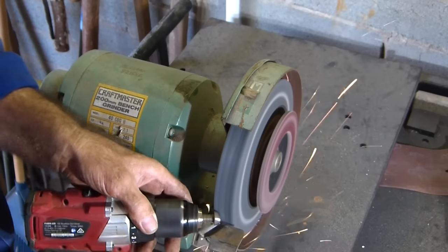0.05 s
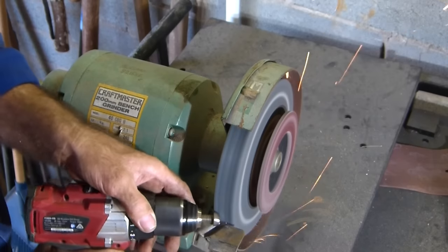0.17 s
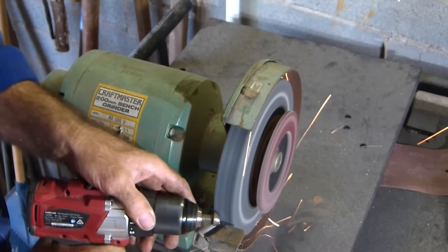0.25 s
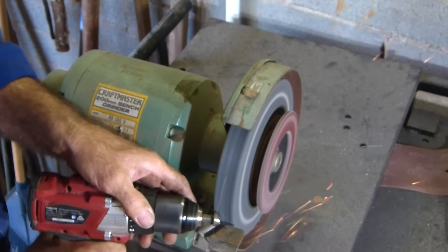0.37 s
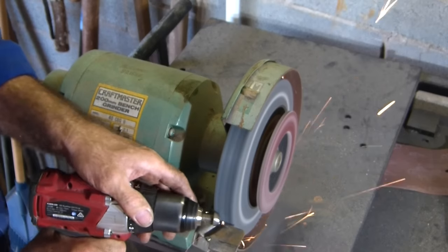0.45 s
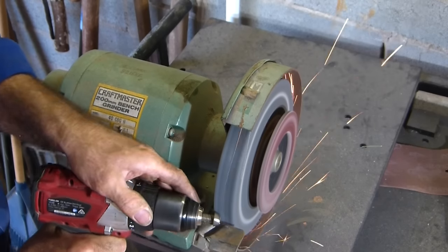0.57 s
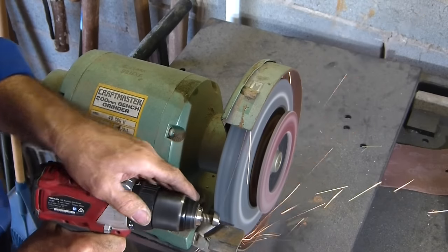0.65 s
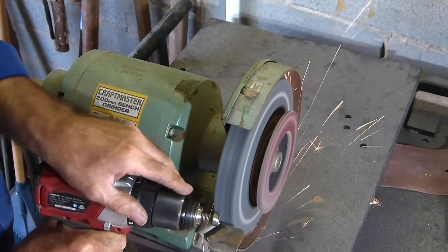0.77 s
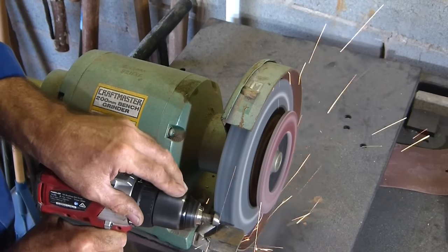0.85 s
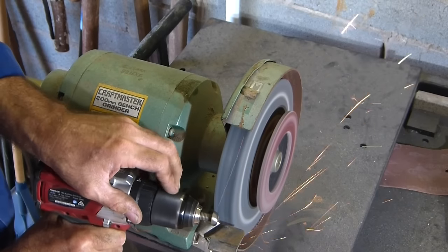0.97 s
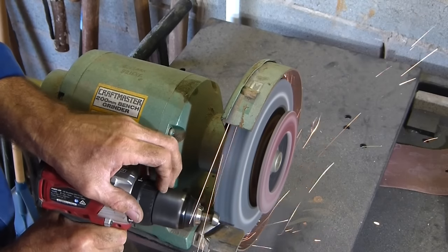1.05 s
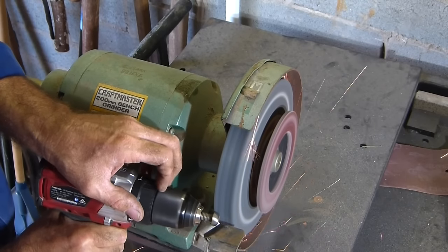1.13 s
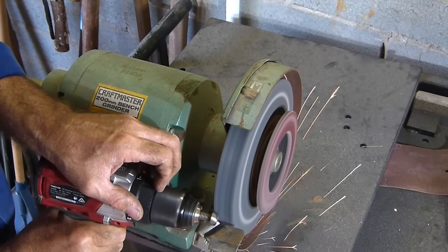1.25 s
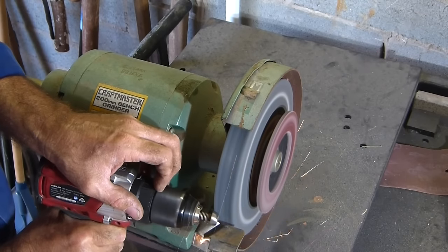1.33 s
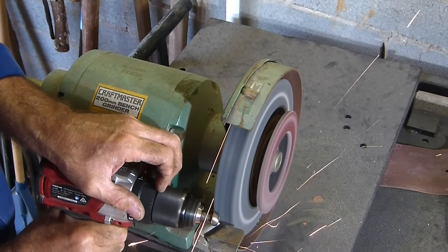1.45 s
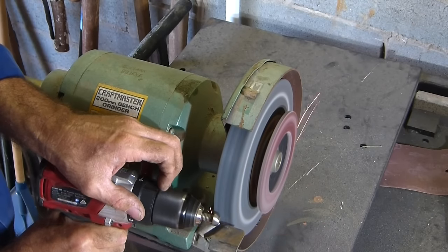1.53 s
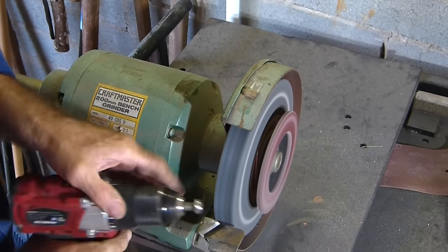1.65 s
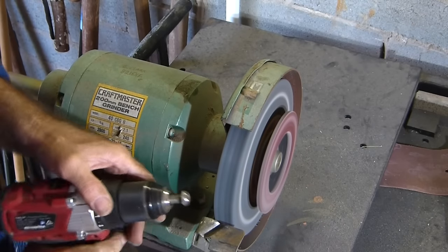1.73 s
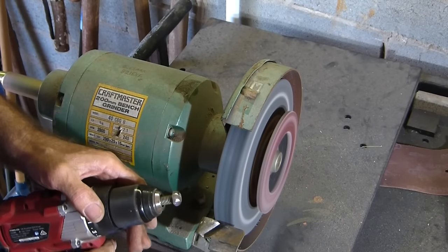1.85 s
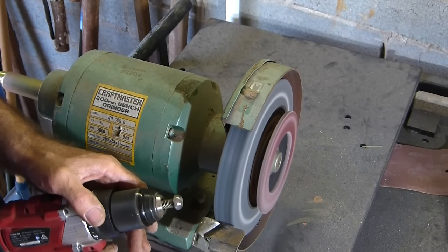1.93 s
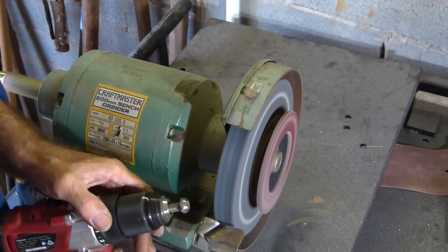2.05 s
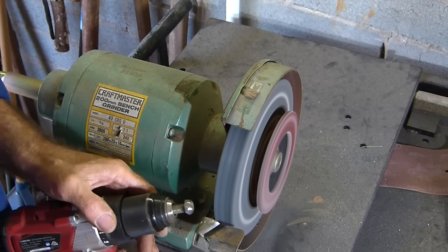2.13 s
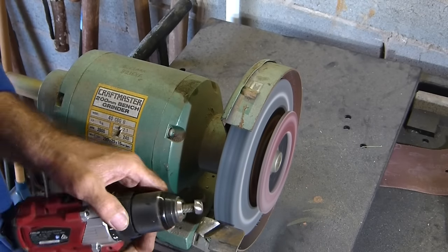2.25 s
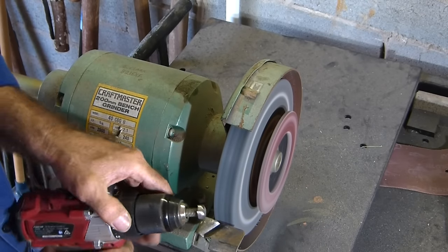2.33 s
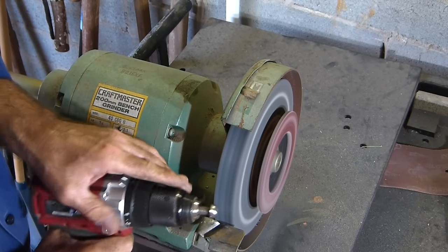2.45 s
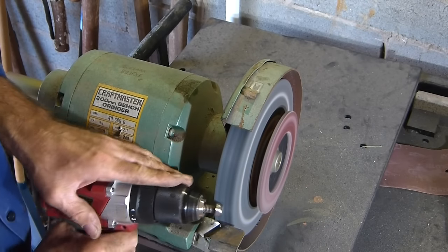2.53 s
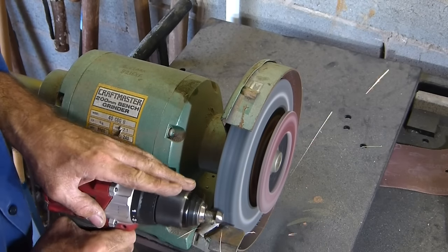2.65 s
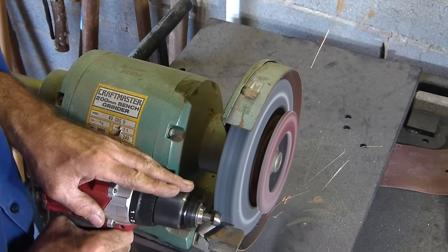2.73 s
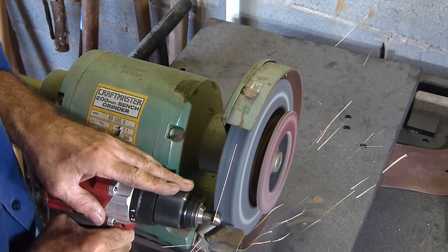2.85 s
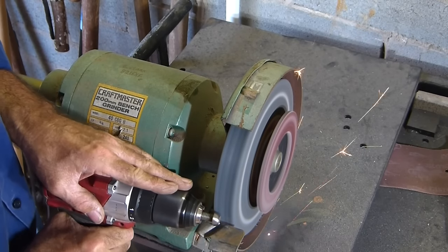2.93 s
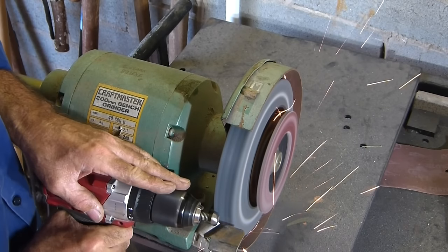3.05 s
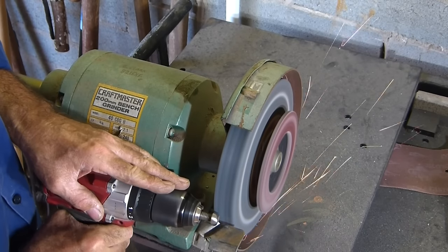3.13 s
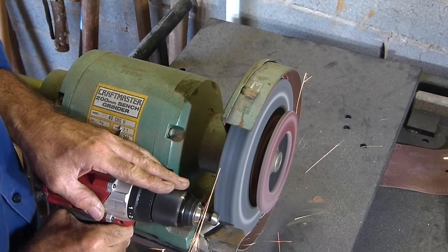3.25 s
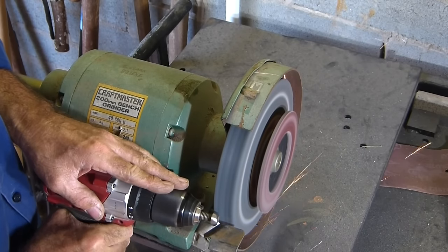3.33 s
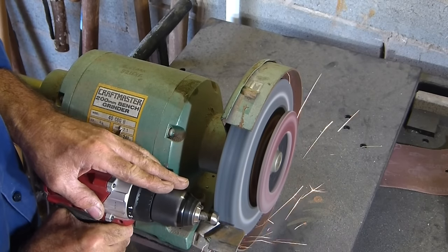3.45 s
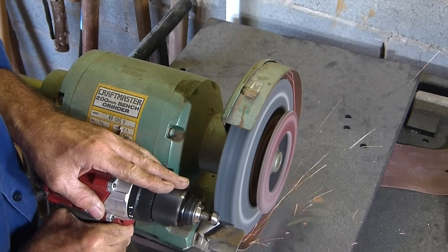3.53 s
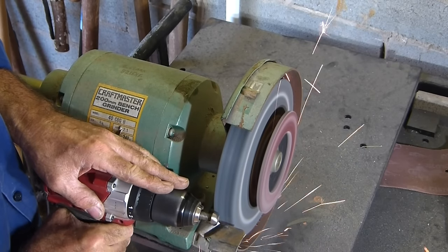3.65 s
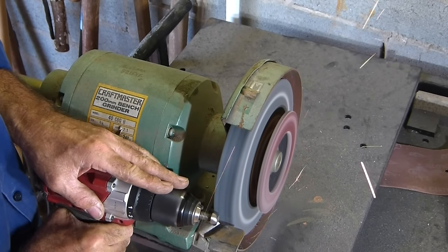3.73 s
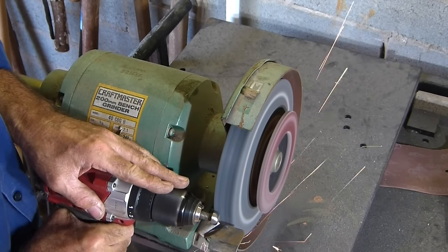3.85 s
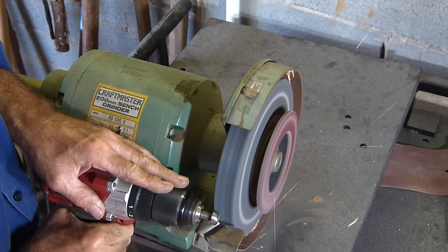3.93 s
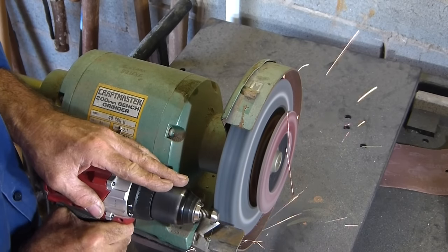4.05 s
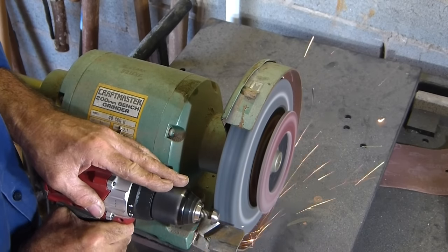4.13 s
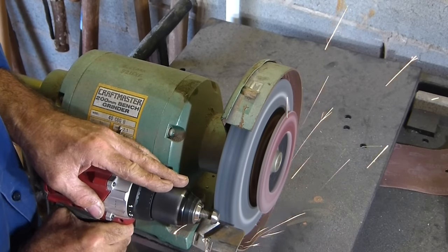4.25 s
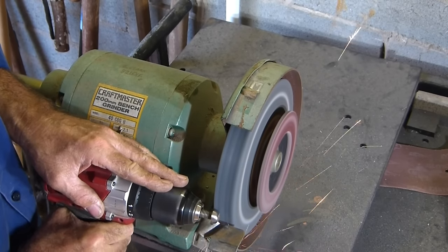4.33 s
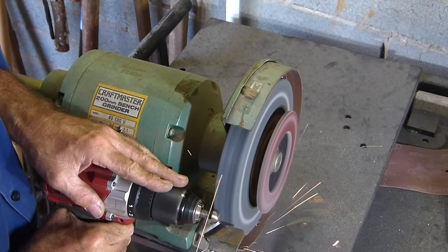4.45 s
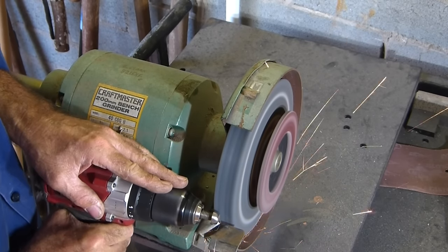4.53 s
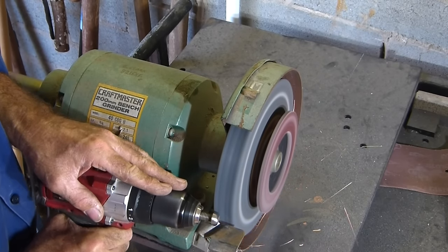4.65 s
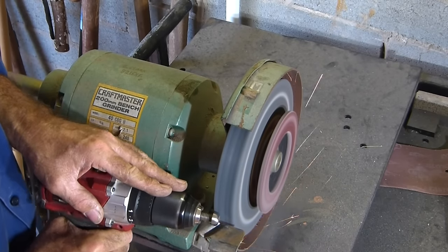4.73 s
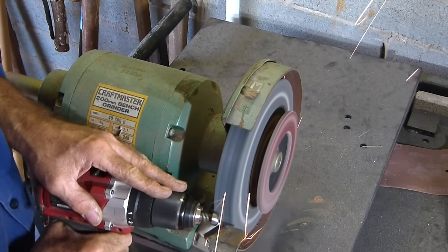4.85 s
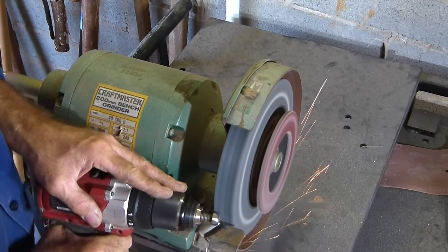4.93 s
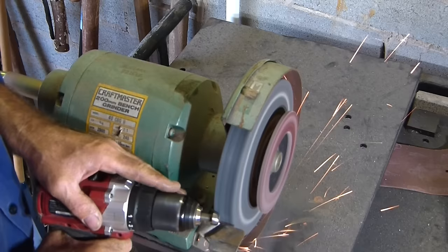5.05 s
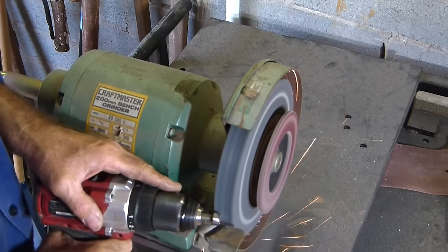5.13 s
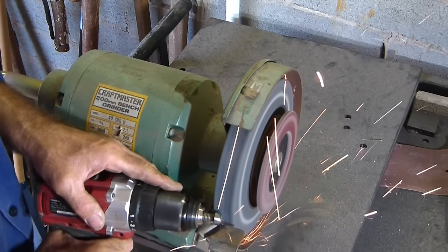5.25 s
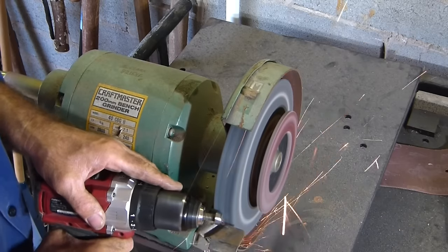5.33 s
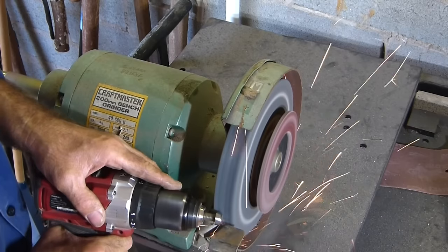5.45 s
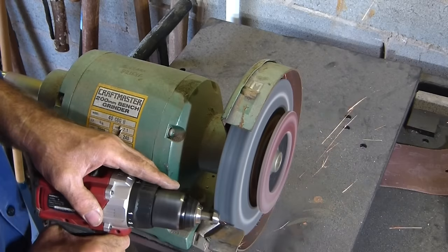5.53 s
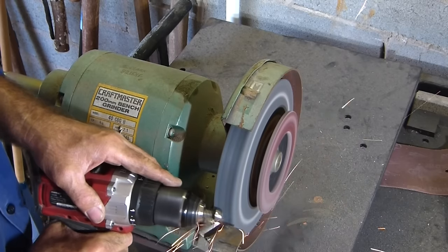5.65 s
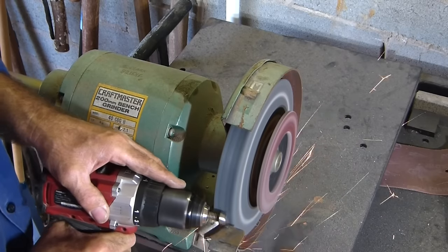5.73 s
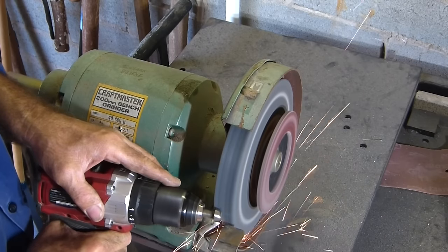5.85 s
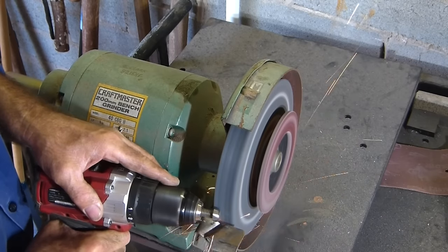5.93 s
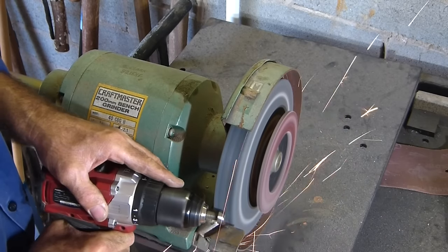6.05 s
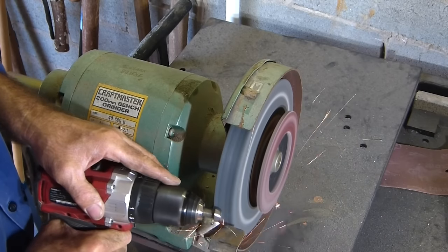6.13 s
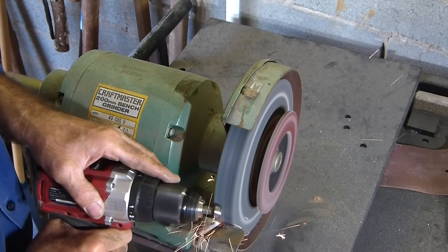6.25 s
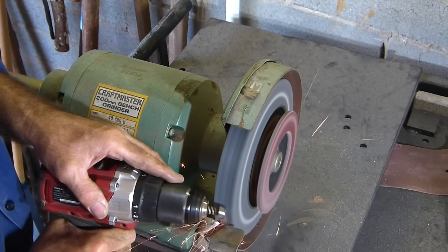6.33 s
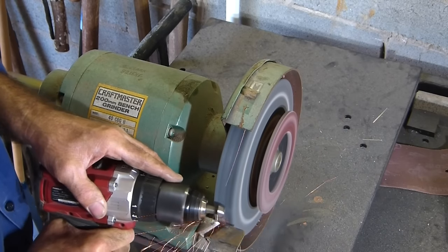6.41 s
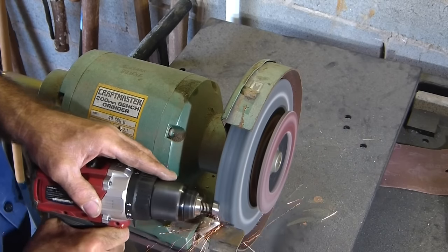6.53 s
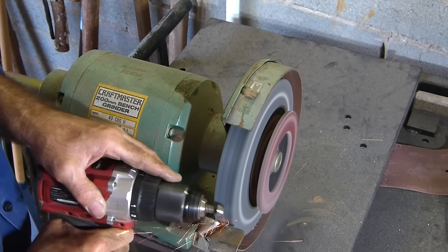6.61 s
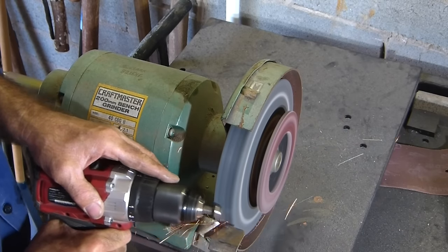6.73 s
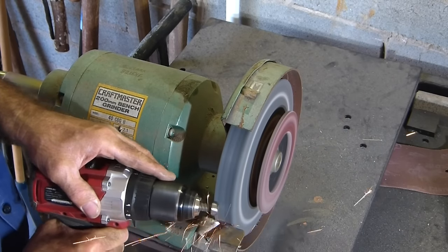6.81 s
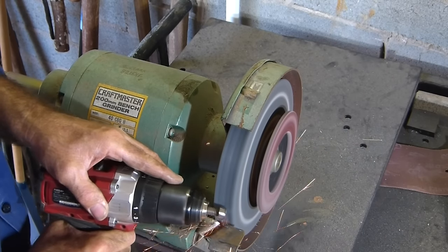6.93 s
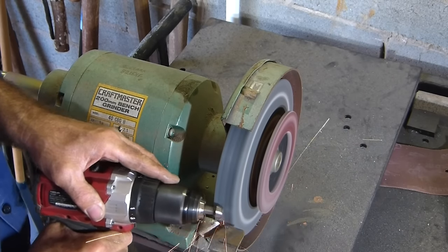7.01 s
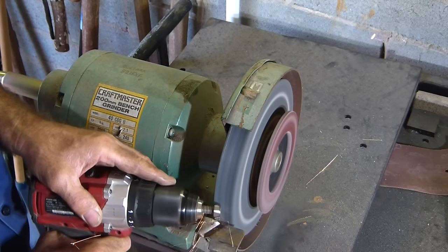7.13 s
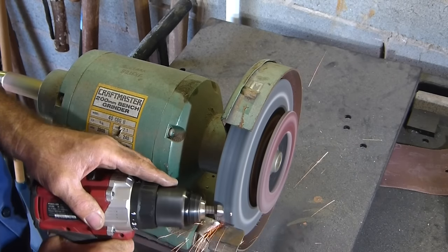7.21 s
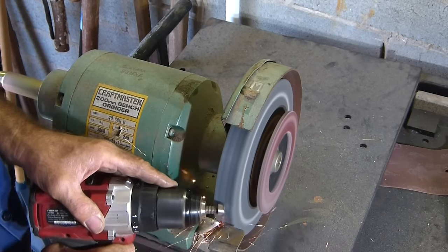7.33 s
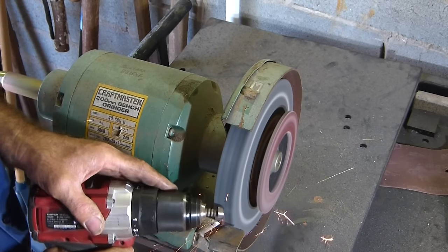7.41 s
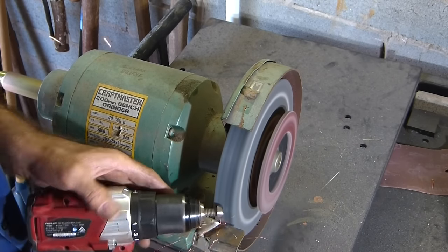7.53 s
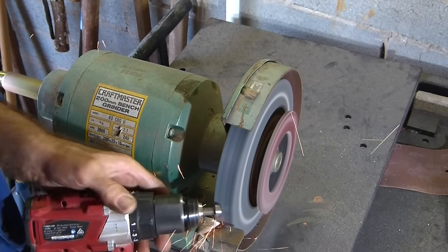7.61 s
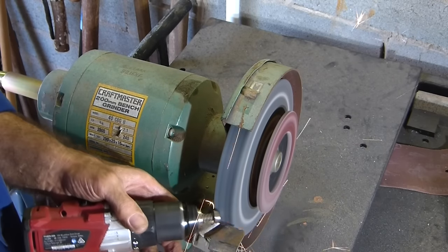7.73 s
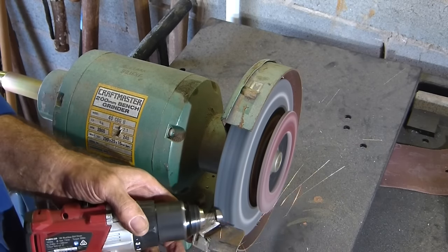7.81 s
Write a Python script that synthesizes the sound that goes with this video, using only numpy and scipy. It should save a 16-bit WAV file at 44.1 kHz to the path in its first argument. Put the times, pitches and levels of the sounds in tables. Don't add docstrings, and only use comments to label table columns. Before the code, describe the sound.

A spinning steel bolt grinds on a bench wheel with a bright buzzing hiss and drill whine, lifts off briefly, then grinds again.

```python
import sys
import numpy as np
from scipy import signal
from scipy.io import wavfile
from scipy.ndimage import uniform_filter1d

SR = 44100
rng = np.random.default_rng(int(sys.argv[2]) if len(sys.argv) > 2 else 0)


def voltage_ratio(decibels):
    exponent = np.asarray(decibels, float) / 20
    return 10 ** exponent


def inscribe(sig):
    pcm = np.round(np.clip(np.atleast_2d(sig).T, -1, 1) * 32767)
    wavfile.write(sys.argv[1], SR, pcm.astype(np.int16))


N = 347067


# f/Hz, likeness/0-1
LIKENESS = [(60, 1), (300, 1), (700, 0.94), (1500, 0.89), (2300, 1), (3100, 0.39), (5000, 0.53),
            (8000, 0.36), (15000, 0.32)]

# f/Hz, density/dB per Hz
IDLE_SPECTRUM = [(15, -51), (25, -37), (64, -29), (96, 0), (174, 0), (298, 1.5), (369, -8), (497, 11),
                 (616, -15.5), (668, -9), (851, -31), (1180, -11), (1860, -17.5), (4770, -19.5),
                 (15600, -30)]
# f/Hz, then MODE
WIND_MODES = [(1276, 170, -13, -1.1, 0, 0.87), (1450, 110, -13.5, 0, 0, 0.97),
              (4900, 260, -12.5, 0, 0, 0.87), (8960, 370, -17, 0, 0, .6)]
# f/Hz, then MODE
FRAME_MODES = [(174.2, 19, -13.5, -0.0007, -0.0064, 1), (305, 29, -38, 0, 0, 1),
               (390.2, 51, -8, 0, 0.028, 1), (489.3, 290, -6.5, -0.16, -0.017, 1),
               (597, 30, -15.5, -.4, -0.12, 0.97)]
# multiple of the turn, level over the rumble/dB
TURN_ORDERS = [(4, -17), (5, -16.5), (6, -16.5), (7, -19.5), (9, -14.5), (10, -14.5), (12, -11.5),
               (20, -26), (24, -18)]
# t/s, level/dB
HUM = [(1.82, -54), (2.15, -59), (2.6, -55), (2.92, -56.5), (3.2, -75.5), (6.07, -63), (6.64, -61),
       (7.23, -59), (7.52, -56.5), (7.87, -59)]
# t/s, level/dB
LEAN = [(1.5, -47), (2.55, -46.5), (7.15, -47.5)]
# t/s, level/dB
APPROACH = [(1.72, -64), (2.17, -60), (2.52, -57)]

# t/s, peak/dB
TAPS = [
    (1.64, -33),
    (2.5345, -24),
    (2.6575, -26),
]
# f/Hz, level/dB, t60/s
TAP_MODES = [(3730, -2, 0.015), (4840, -2, 0.03), (5350, -0.5, 0.025), (5830, -5, 0.027), (8300, -1, .01),
             (9900, -2, 0.01)]

# start/s, end/s
TRIGGER = [
    (0.0, 1.636),
    (2.655, 7.87),
]
# t/s, level/dB
VENTS = [(0.1, -66), (0.21, -53), (0.47, -46), (0.76, -57), (0.85, -76), (1.14, -66), (1.2, -56),
         (1.58, -45.5), (1.61, -53), (1.625, -43), (1.65, -56), (2.668, -41), (2.78, -43.5), (2.98, -49),
         (3.11, -46.5), (3.36, -51.5), (3.5, -50), (4.09, -47.5), (4.8, -50), (4.96, -57), (5.12, -68),
         (5.24, -53), (5.47, -54.5), (5.95, -51.5), (6.28, -50), (6.36, -49), (6.97, -48.5), (7.33, -44),
         (7.64, -46.5), (7.87, -56)]
# t/s, f/Hz, level/dB
SPIN_UP_SQUEAK = [(2.606, 10400, -57), (2.62, 10700, -57), (2.642, 10900, -59)]
GEAR_START = [(2.605, 2300, -54), (2.615, 2250, -50), (2.628, 2350, -51)]
GEAR_CATCH = [(2.628, 1700, -49), (2.64, 1600, -53), (2.652, 1850, -50)]
# start/s, end/s, level/dB
LOOSE_GRIP = [(0.12, 0.75, -47.5), (0.8, 1.45, -44.5), (2.64, 2.67, -48.5), (2.74, 3.42, -46.5),
              (4.79, 4.98, -43.5), (5.02, 5.18, -46.5), (5.24, 5.41, -44)]
# f/Hz, density/dB per Hz
RATTLE_SPECTRUM = [(440, -7.5), (750, -5), (922, -12), (1370, 0), (1480, -4.5), (1840, -5.5), (2450, -31),
                   (2500, -19), (3250, -15), (5500, -120)]
RATTLE_HZ = [987, 1124, 1357, 1550, 1822, 2088]
RATTLE_MODES = [(20, -16, 3, 0, 0.9), (35, -12, 0, 0, .95), (55, -6.5, 0, 0, 0.99), (40, -14, 0, 0, .95),
                (80, -4, -3, 0.034, 1), (45, -12, 0, 0, .95)]

# t/s, peak/dB, f/Hz
FLECKS = [(0.176, -23, 4640), (0.4609, -20, 5160), (2.5341, -26, 4850), (2.6583, -30, 4700),
          (3.2715, -20, 4860), (3.5483, -30, 6010), (3.5892, -24, 4920), (3.6215, -22, 5210),
          (3.8242, -29, 5880), (4.1315, -22, 5180), (4.2158, -29, 5120), (4.335, -28, 4880),
          (4.4104, -25, 5210), (4.4493, -23, 4880), (4.578, -23, 5390), (4.6124, -23, 5200),
          (4.7252, -20, 4900), (4.8484, -23, 5200), (4.9028, -25, 6160), (5.0809, -25, 5130),
          (5.1542, -18, 6120), (5.194, -16, 4840), (5.2345, -17, 5340), (5.2834, -23, 5220),
          (5.5573, -24, 6020), (5.5997, -34, 5540), (5.672, -31, 6120), (5.7354, -30, 6070),
          (6.1878, -21, 5130), (6.2238, -27, 5460), (6.2677, -26, 5820), (6.4248, -32, 5220),
          (6.4911, -19, 5000), (6.561, -23, 6150), (6.759, -27.5, 6080), (6.792, -24, 5260),
          (6.8154, -18, 6090), (6.8598, -24, 5430), (7.0329, -28, 6060), (7.087, -17, 6060),
          (7.206, -20, 5260), (7.2873, -26, 5110), (7.3123, -29, 4950), (7.428, -22, 6090),
          (7.4869, -30, 5130), (7.5288, -28, 5058), (7.5677, -24, 5110), (7.6016, -21, 5100),
          (7.7209, -24, 5210), (7.7801, -30, 6060)]
# t/s, peak/dB, f/Hz
GUARD_TICKS = [(0.2377, -40, 10800), (0.4203, -30, 10800), (0.4767, -35, 10700), (0.5021, -40, 10800),
               (0.573, -40, 10600), (0.6014, -34, 10800), (0.6807, -40, 10700), (0.7057, -36, 10800),
               (0.7506, -37, 10900), (0.793, -42, 10800), (0.8708, -43, 10700), (0.9032, -38, 10700),
               (0.992, -36, 10700), (1.0274, -36, 10700), (1.0664, -37, 10800), (1.1088, -37, 10800),
               (1.1537, -36, 10800), (1.1886, -33, 10800), (1.2315, -40, 10800), (1.2699, -37, 10700),
               (1.3038, -35, 10700), (1.3462, -40, 10900), (1.3871, -37, 10700), (1.425, -35, 10700),
               (1.4694, -38, 10900), (1.4989, -39, 10800)]
# t/s, f/Hz, level/dB, t60/s
AFTER_RING = [(2.55, 3400, -51, 0.25), (2.545, 6060, -51, .06), (2.56, 7200, -49, .2),
              (2.56, 9800, -52, .1), (2.676, 7284, -46, .06)]

# f/Hz; MODE; rest/dB, slope/dB per s, ring-out/dB per s
SONG_HZ = [3526, 7005, 7284, 11391]
SONG_MODES = [(21.7, -2.5, -5.5, -0.2, 0.75), (22, 2, 6, -3.5, 0.19), (21.6, 4.5, -5, 0.6, 0.79),
              (16, 2.4, 2.5, 1.1, 0.94)]
SONG_RULES = [(-54, 27, 780), (-61.5, 20, 690), (-64, 54, 240), (-67, 25, 200)]
# t/s, level/dB
SONG_LOW = [(0.2, -40.5), (0.45, -44), (0.93, -43.5), (1.14, -43), (1.5, -44), (3.1, -40.5), (3.3, -37.5),
            (3.45, -40), (3.9, -38.5), (4.08, -38), (4.34, -37.5), (4.69, -40), (5.53, -40), (5.91, -42.5),
            (6.1, -39.5), (6.55, -41.5), (6.84, -42), (7.1, -43.5), (7.68, -38.5)]
SONG_MID = [(0.48, -47.5), (1.1, -51), (1.59, -48), (3.15, -51), (3.62, -48.5), (3.95, -49), (4.5, -53),
            (5.3, -51.5), (5.63, -53), (6.84, -57), (7.68, -51), (7.87, -46)]
SONG_TWIN = [(0.0, -41), (0.45, -47), (0.73, -52), (1.08, -49), (1.35, -51), (1.55, -48), (2.84, -45),
             (3.12, -44.5), (3.3, -44), (3.62, -44.5), (3.9, -45), (4.2, -44), (4.57, -46), (5.05, -43),
             (5.63, -46), (6.26, -44.5), (6.57, -49), (6.85, -46), (7.15, -49), (7.87, -57)]
SONG_HIGH = [(0.27, -57), (0.72, -53), (1.22, -57), (1.68, -46.5), (2.9, -46), (3.28, -38.5), (3.5, -41),
             (3.85, -40), (4.16, -41), (4.65, -42.5), (5.1, -48), (5.63, -45), (5.92, -48), (6.26, -49),
             (6.84, -52), (7.7, -49)]
# t/s, level/dB
WAKE = [(1.8, -1), (1.9, -8), (2.68, -6), (2.8, -2.5)]
# t/s, level/dB
REST = [(0.05, -43.5), (0.4, -45.5), (7.6, -47.5)]
# t/s, level/dB
CHUCK = [(0.2, -70), (0.35, -58), (0.6, -61), (1.1, -58), (1.45, -59), (1.62, -100)]

# f/Hz, density/dB per Hz
HISS_SPECTRUM = [(1180, -17.5), (2000, -11.5), (2970, -10.5), (3440, -4.5), (4120, -9.5), (7640, -4),
                 (9720, -7), (10500, -6), (12200, -6), (14600, -24.5), (15600, -53)]
# f/Hz, then MODE
CHIPPED_MODES = [(5090, 1080, -1.5, 0.73, -0.11, 0.96), (6060, 160, -8.5, -.6, .06, 0.93)]
# f/Hz; MODE; rest/dB, slope/dB per s, ring-out/dB per s
FED_HZ = [3930, 4247, 11768]
FED_MODES = [(14, -13, 2, -0.37, .95), (26, -20.5, -7, -.4, 0.9), (24, -8.5, 0, -2.3, .7)]
FED_RULES = [(-48, 4.0, 600), (-42, 6.9, 600), (-48, 70, 330)]
# t/s, level/dB
FED_SWELLS = [
    [(5.5, -41), (6.3, -42), (7.0, -38)],
    [(.4, -29), (5.8, -32), (6.7, -29), (7.3, -32)],
    [(.38, -41), (.73, -38), (.89, -41), (1.01, -41), (1.27, -39), (1.42, -40), (3.0, -42), (3.3, -39),
     (3.6, -41), (3.9, -40), (4.7, -41), (5.7, -40), (6.9, -43), (7.5, -42)],
]

# t/s, f/Hz
BOLT_PITCH = [(0.0, 9780), (1.6, 9760), (2.9, 9730), (3.6, 9630), (5.2, 9650), (6.5, 9620), (7.87, 9680)]
BOLT_RATIOS = [1, 1.245, .357]
BOLT_MODES = [(230, 3, 0.7, -0.4, 0.86), (200, -9, -6.5, 0.79, 0.58), (430, -9, 1.5, 0.047, 0.79)]
# t/s, f/Hz
SHANK_PITCH = [(0, 3335), (1.6, 3340), (2.9, 3345), (3.5, 3358), (7.87, 3366)]
# t/s, level/dB
SHANK = [(0.06, -44), (0.3, -44), (0.55, -45), (0.85, -46), (1.0, -45), (1.2, -44), (1.3, -46), (1.45, -44),
         (3.02, -45), (3.2, -40.5), (3.42, -39), (3.7, -41.5), (4.08, -40), (4.35, -42), (4.62, -40.5),
         (5.2, -42), (5.62, -42.5), (6.2, -44.5), (6.83, -43.5), (7.13, -43), (7.48, -39.5), (7.68, -38.5)]
# t/s, peak/dB
BITES = [(0.094, -19.5), (0.182, -26), (0.5766, -17.5), (0.7148, -28), (0.768, -18), (0.8515, -33),
         (0.9901, -21), (1.039, -18), (1.08, -21), (1.2047, -20), (1.283, -22), (1.478, -22), (1.5484, -30),
         (1.5565, -35), (1.566, -32), (1.5715, -20), (1.5908, -29), (1.6, -33), (2.6572, -22), (2.68, -22),
         (2.6843, -21), (2.701, -20), (2.7242, -20), (2.7405, -22), (2.83, -18), (2.8629, -17),
         (2.928, -16.5), (3.022, -20), (3.1487, -31), (3.2994, -24), (3.4521, -24), (3.5344, -23),
         (3.6691, -18.5), (4.114, -26), (4.1634, -28), (4.2462, -24), (4.3874, -18), (4.948, -17),
         (5.1317, -29), (5.3802, -19), (5.466, -27), (5.6146, -24), (5.8112, -18), (6.0117, -21),
         (6.2327, -26), (6.366, -16.5), (6.62, -19.5), (6.7575, -21), (6.8503, -21), (6.9252, -23),
         (7.0344, -21), (7.194, -26), (7.227, -23), (7.2898, -28), (7.4285, -20), (7.582, -17.5),
         (7.621, -15), (7.6894, -17), (7.7757, -28)]

# start/s, end/s, hiss/dB, ring/dB
TOUCHES = [(0.0, 1.558, -44.5, -39), (1.564, 1.612, -47.5, -47), (1.6, 1.652, -55, -64),
           (1.627, 1.634, -52, -51), (1.638, 1.653, -52.5, -58), (2.534, 2.538, -45, -54),
           (2.549, 2.559, -54, -41), (2.562, 2.6, -60, -60), (2.604, 2.645, -55, -62),
           (2.649, 2.655, -54, -35), (2.657, 2.66, -41, -32.5), (2.662, 2.677, -49, -62),
           (2.679, 7.87, -42.5, -38.5)]
# t/s, level/dB
PUSH = [(0.0, -0.5), (0.3, 1), (0.7, 0), (1.2, -2), (1.55, 0.5), (2.7, -1), (2.85, 1.5), (3.3, -2.5),
        (4.0, -1), (4.7, -1), (5.2, -1), (5.7, -0.5), (6.3, 0), (6.8, 0), (7.4, -1.5), (7.87, -2)]

CORNERS_HZ, WHEEL_HZ, TURN_HZ = 126, 50.5, 49.75


def rms_one(x):
    return x / np.sqrt(np.mean(np.abs(x) ** 2) + 1e-20)


def in_time(rows):
    s, *columns = np.transpose(rows)
    return [np.interp(np.arange(N) / SR, s, c) for c in columns]


def at_hz(points, hz):
    point_hz, value = np.transpose(points)
    return np.interp(np.log(hz), np.log(point_hz), value)


def held(start_s, end_s, fade_s):
    t = np.arange(N) / SR
    return np.clip(1 + np.minimum(t - start_s, end_s - t) / fade_s, 0, 1)


def bouts(rows, rise, fall):
    t = np.arange(N) / SR
    off = [rise * np.clip(start - t, 0, None) + fall * np.clip(t - end, 0, None) for start, end, *_ in rows]
    levels = np.transpose(rows)[2:]
    return [np.max([db - o for db, o in zip(column, off)], axis=0) for column in levels]


def swells(peaks, rest_db, slope_db_per_s, ring_out_db_per_s, contact_db=0):
    t = np.arange(N) / SR
    level, = bouts([(s, s, db) for s, db in peaks], slope_db_per_s, slope_db_per_s)
    fall = ring_out_db_per_s * t
    return np.maximum(level, rest_db) + np.maximum.accumulate(contact_db + fall) - fall


def drift(rate_hz):
    r = np.exp(-40 * np.pi * rate_hz / SR)
    slow = signal.lfilter([1], [1, -2 * r, r * r], rng.standard_normal(N // 20 + 4002))[4000:]
    return np.interp(np.arange(N) / 20, np.arange(len(slow)), rms_one(slow))


def throb(rate_hz, wander, sharp, uneven_db):
    turns = np.cumsum(rate_hz * (1 + wander * drift(13.25))) / SR
    strength = rng.standard_normal(2000)[turns.astype(int)]
    return rms_one(voltage_ratio(uneven_db * strength) * np.exp(sharp * -np.cos(2 * np.pi * turns)))


def chips(per_s, size, decay_s):
    born = (rng.random(N) < per_s / SR) * np.minimum(rng.exponential(1, N), 2.5) * size
    return rms_one(1 + signal.lfilter([1], [1, -np.exp(-1 / (decay_s * SR))], born))


def mode(hz, width_hz, level_db, pan_db, lead_rad, alike, drive=1, steady=0):
    r, skirt = np.exp(-np.pi * width_hz * np.array([1, 3.0]) / SR)
    push = rng.standard_normal((2, N // 4 + 1)) + 1j * rng.standard_normal((2, N // 4 + 1))
    swing = signal.lfilter([1], np.poly([r, skirt]), np.repeat(push, 4, axis=1)[:, :N] * drive)
    alike = np.clip(alike, 0, 1)
    right = (alike * swing[0] + np.sqrt(1 - alike ** 2) * swing[1]) * np.exp(1j * lead_rad)
    pair = np.array([swing[0], right]) * voltage_ratio(np.array([[.5], [-.5]]) * pan_db)
    pair = pair / (np.abs(rms_one(pair.mean(axis=0))) + .15) ** np.clip(steady, 0, 1)
    carrier = np.exp(2j * np.pi * np.cumsum(hz * np.ones(N)) / SR)
    out = (pair * carrier).real
    return voltage_ratio(level_db) * out / out.mean(axis=0).std()


def banded_noise(spectrum, patchy_db, flicker_hz):
    bottom, top = spectrum[0][0], spectrum[-1][0]
    edges = bottom * 2 ** np.arange(0, np.log2(top / bottom) + .3, 1 / 3)
    white = rng.standard_normal((2, 2, N))
    out = 0
    for k, (low, high) in enumerate(zip(edges, edges[1:])):
        band = signal.butter(2, [low, min(high, 19000)], "band", fs=SR, output="sos")
        mid, side = signal.sosfilt(band, white[k % 2])
        hz = np.sqrt(low * high)
        alike = np.clip(at_hz(LIKENESS, hz), 0, .996)
        gain = voltage_ratio(at_hz(spectrum, hz) + patchy_db * drift(flicker_hz))
        out = out + gain * (np.sqrt(1 + alike) * mid + np.sqrt(1 - alike) * side * [[1], [-1]])
    return out / out.mean(axis=0).std()


def grinder(contact_db):
    idle_db, load_db, waver_db, settle_s = -53.5, -49.5, -1.5, 0.053
    load = uniform_filter1d(voltage_ratio(contact_db), round(settle_s * SR), mode="nearest")
    rumble_db = idle_db + (load_db - idle_db) * load + waver_db * drift(8.3)
    lean_db = swells(LEAN, rest_db=-80, slope_db_per_s=31, ring_out_db_per_s=300)
    rumble_db = np.maximum(rumble_db, lean_db)
    noise = banded_noise(IDLE_SPECTRUM, patchy_db=1.7, flicker_hz=20)
    low = signal.sosfilt(signal.butter(4, 800, fs=SR, output="sos"), noise)
    top = signal.sosfilt(signal.butter(4, 800, "high", fs=SR, output="sos"), noise)
    rumble = voltage_ratio(-8.0) * rms_one(low) + sum(mode(*row) for row in FRAME_MODES)
    rumble = rumble + sum(mode(TURN_HZ * round(k), 5, db, 0, 0, .998, steady=.7) for k, db in TURN_ORDERS)
    hum_db = swells(HUM, rest_db=-71, slope_db_per_s=64, ring_out_db_per_s=300)
    hum = voltage_ratio(hum_db) * mode(2 * TURN_HZ, 5, -1.7, 0, 0, .999, steady=.8)
    wind = rms_one(top) + sum(mode(*row) for row in WIND_MODES)
    return voltage_ratio(rumble_db) * rumble + hum + voltage_ratio(in_time(APPROACH)[0] + 3.5) * wind


def taps():
    out = np.zeros((2, N))
    t = np.arange(2000) / SR
    for s, db in TAPS:
        crack = voltage_ratio(-14) * rng.standard_normal((2, 2000)) * np.exp(-t / 0.0024)
        rings = sum(voltage_ratio(lv - 4.5 - 60 * t / t60) * np.sin(2 * np.pi * hz * t) for hz, lv, t60 in TAP_MODES)
        at = round(s * SR)
        out[:, at:at + 2000] += voltage_ratio(db) * (crack + rings) * np.clip(t / 0.00053, 0, 1)
    return out


def motor():
    whine_hz, creep_hz_per_s, wobble_hz = 2613, 1.2, 5
    start_hz, climb_s, sag_hz, sag_s = 1960, 0.018, 110, 0.014
    skirt_db, rough_db, rough_s, half_db = -17.5, 1.5, 0.032, -18.5
    t = np.arange(N) / SR
    (first_on, let_go), (pulled, last_off) = TRIGGER
    second = t > 2
    since_pull = np.clip(t - pulled, 0, None)
    climb = np.exp(-since_pull / climb_s)
    sag = sag_hz * np.exp(-np.clip(let_go - t, 0, None) / sag_s)
    hz = whine_hz + creep_hz_per_s * t + wobble_hz * drift(8.7)
    hz = hz - np.where(second, (whine_hz - start_hz) * climb, sag)
    running = held(first_on, let_go, .025) + held(pulled, last_off, .003)
    whine = mode(hz, 4, 0, 0.76, -1.52, .97, steady=1)
    rough_gain = voltage_ratio(skirt_db) + second * np.exp(-since_pull / rough_s)
    rough = rough_gain * mode(hz, 210, rough_db, 0.82, -1.3, 1.0)
    half = (1 - climb * second) ** 4 * mode(hz / 2, 9.5, half_db, 0, 0, 0.79, steady=0.3)
    return running * voltage_ratio(in_time(VENTS)[0]) * (whine + rough + half)


def gears():
    out = 0
    for rows, width_hz, steady in [(SPIN_UP_SQUEAK, 60, .6), (GEAR_START, 320, 0), (GEAR_CATCH, 300, 0)]:
        hz, db = in_time(rows)
        tone = mode(hz, width_hz, 0.11, 0.76, -0.51, 1.0, steady=steady)
        out = out + held(rows[0][0], rows[-1][0], 0.011) * voltage_ratio(db) * tone
    return out


def rattle(contact_db):
    firm_db, grip_db_per_s, waver_db = -51.5, 110, 1.0
    knocks = throb(CORNERS_HZ / 6, wander=0.052, sharp=0.4, uneven_db=.8)
    body = banded_noise(RATTLE_SPECTRUM, patchy_db=2.0, flicker_hz=20)
    for hz, row in zip(RATTLE_HZ, RATTLE_MODES):
        body = body + mode(hz, *row, drive=knocks, steady=0.084)
    loose_db, = bouts(LOOSE_GRIP, grip_db_per_s, grip_db_per_s)
    shake_db = np.maximum(loose_db, firm_db) + waver_db * drift(21.0)
    return voltage_ratio(shake_db + 0.42 * contact_db - 4.5) * body


def pings():
    out, t = np.zeros((2, N + 8000)), np.arange(8000) / SR
    fleck_top_db, fleck_db, fleck_t60_s = -24, -5, 0.012
    guard_db, guard_t60_s = -0.5, 0.035
    rows = [(s, hz, min(db, fleck_top_db) + fleck_db, fleck_t60_s) for s, db, hz in FLECKS]
    rows += list(AFTER_RING)
    rows += [(s, hz, db + guard_db, guard_t60_s) for s, db, hz in GUARD_TICKS]
    for (s, hz, db, t60), (phase, pan) in zip(rows, rng.uniform(-0.8, 1, (len(rows), 2))):
        tone = np.sin(2 * np.pi * hz * t + np.pi * phase) * voltage_ratio(db - 60 * t / t60)
        tone = tone * np.clip(t / 0.00034, 0, 1)
        at = round(s * SR)
        out[:, at:at + 8000] += tone * voltage_ratio(2 * pan * np.array([[1], [-1]]))
    return out[:, :N]


def wheel(contact_db):
    wake_db, = in_time(WAKE)
    tables = SONG_LOW, SONG_MID, SONG_TWIN, SONG_HIGH
    song = 0
    for peaks, rule, hz, row in zip(tables, SONG_RULES, SONG_HZ, SONG_MODES):
        level_db = swells(peaks, *rule, contact_db) + wake_db + 2.5 * np.tanh(2 * drift(14))
        song = song + voltage_ratio(level_db) * mode(hz, *row, steady=0.35)
    rest_db = swells(REST, -56.5, 17, 730, contact_db)
    rest = voltage_ratio(rest_db) * mode(3680, 200, 0, -1.8, -0.17, 0.95)
    chuck = voltage_ratio(in_time(CHUCK)[0]) * mode(2860, 30, 0, 0, 0, 0.94, steady=.3)
    guard = held(0, 1.56, .04) * voltage_ratio(-53) * mode(9200, 120, 0, -1.7, .2, 0.71)
    return song + rest + chuck + guard


def grit(hiss_db, contact_db):
    turn = throb(WHEEL_HZ, wander=0.031, sharp=0.062, uneven_db=1.0)
    hiss = voltage_ratio(3.5) * banded_noise(HISS_SPECTRUM, patchy_db=1.0, flicker_hz=40)
    hiss = hiss * turn * chips(120, 0.41, 0.0039)
    struck = sum(mode(*row, drive=chips(140, 1.05, 0.002)) for row in CHIPPED_MODES)
    wake_db, = in_time(WAKE)
    fed = 0
    for peaks, rule, hz, row in zip(FED_SWELLS, FED_RULES, FED_HZ, FED_MODES):
        fed = fed + voltage_ratio(swells(peaks, *rule, contact_db) + wake_db) * mode(hz, *row, steady=0.46)
    return voltage_ratio(hiss_db) * (hiss + struck) + fed


def bolt(ring_db, contact_db):
    pitch_hz, = in_time(BOLT_PITCH)
    shank_hz, = in_time(SHANK_PITCH)
    corners = throb(CORNERS_HZ, wander=.11, sharp=.45, uneven_db=1.5)
    modes = list(zip(BOLT_RATIOS, BOLT_MODES))
    rings = corners * sum(mode(pitch_hz * ratio, *row, steady=0.18) for ratio, row in modes)
    shank_db = swells(SHANK, -50, 30, 800, contact_db)
    shank = mode(shank_hz, 48, -.5, -2.5, -0.54, 0.8, drive=corners, steady=0.3)
    shank = shank + mode(3135, 35, -15, 0, 0, .8)
    bites = np.zeros(N)
    bites[[round(s * SR) for s, db in BITES]] = voltage_ratio(np.array(BITES)[:, 1] - 11)
    t = np.arange(600) / SR / 0.0013
    flare = signal.fftconvolve(bites, t * np.exp(1 - t))[:N]
    struck = sum(mode(pitch_hz * ratio, *row, steady=0.17) for ratio, row in modes[:2])
    return voltage_ratio(ring_db) * rings + voltage_ratio(shank_db) * shank + flare * struck


def scene():
    land_db_per_s, lift_db_per_s, ring_stop_db_per_s = 5000, 1100, 2500
    hiss_waver_db, ring_waver_db, waver_hz = 0.63, 0.5, 2.9
    hiss_db = bouts(TOUCHES, land_db_per_s, lift_db_per_s)[0]
    ring_db = bouts(TOUCHES, land_db_per_s, ring_stop_db_per_s)[1]
    contact_db = np.clip(hiss_db - TOUCHES[0][2], -90, 0)
    push_db, = in_time(PUSH)
    wake_db, = in_time(WAKE)
    hiss_db = hiss_db + 0.15 * push_db + 0.14 * wake_db + hiss_waver_db * drift(waver_hz)
    ring_db = ring_db + push_db + ring_waver_db * drift(waver_hz)
    drill = motor() + gears() + rattle(contact_db)
    rub = wheel(contact_db) + grit(hiss_db, contact_db) + bolt(ring_db, contact_db)
    return grinder(contact_db) + taps() + drill + pings() + rub


def roll_off(x):
    return signal.sosfilt(signal.butter(12, 15600, fs=SR, output="sos"), x)


def record(dry):
    heard = signal.sosfilt(signal.butter(1, 60, "high", fs=SR, output="sos"), dry)
    heard = signal.sosfilt(signal.butter(4, 15200, fs=SR, output="sos"), heard)
    return roll_off(heard)


dry = scene()
out = record(dry)
inscribe(out)
```